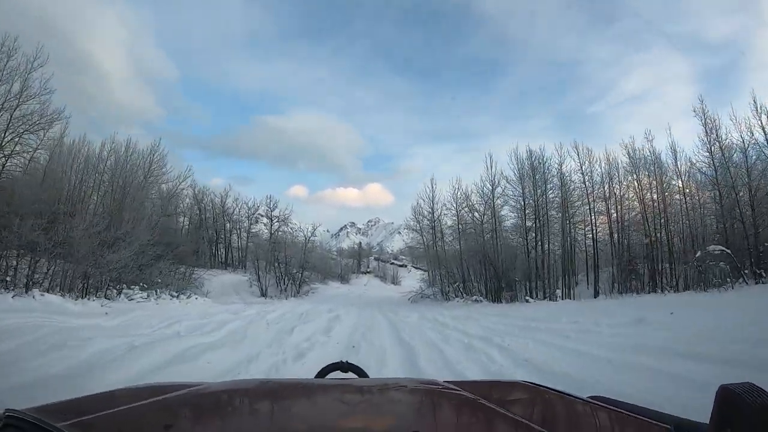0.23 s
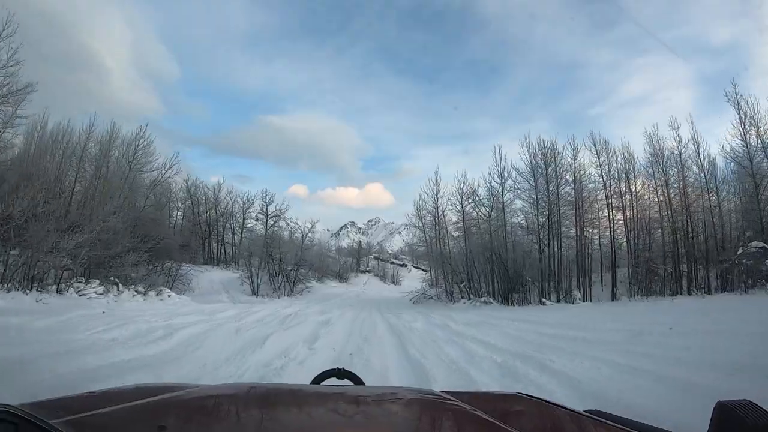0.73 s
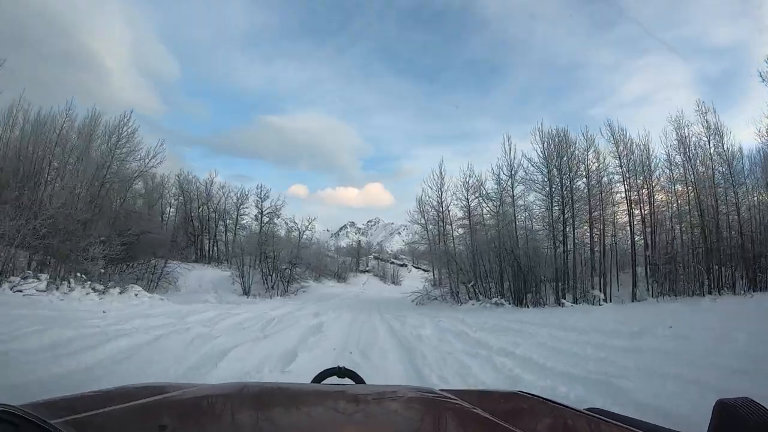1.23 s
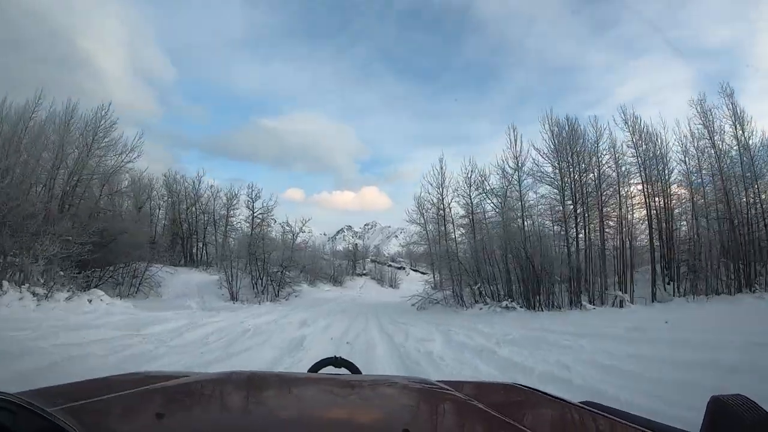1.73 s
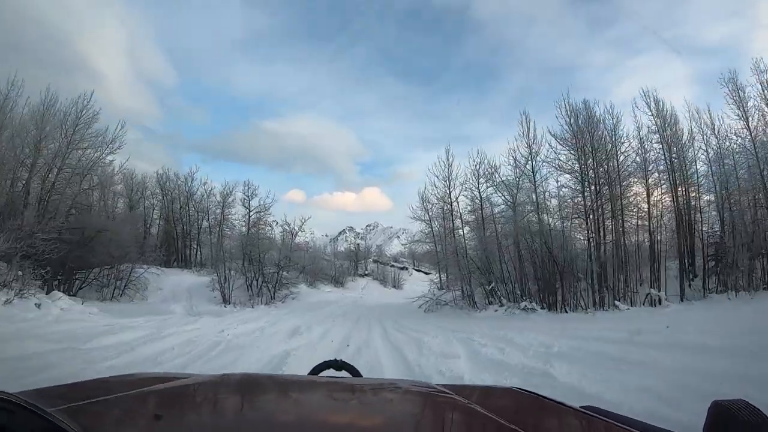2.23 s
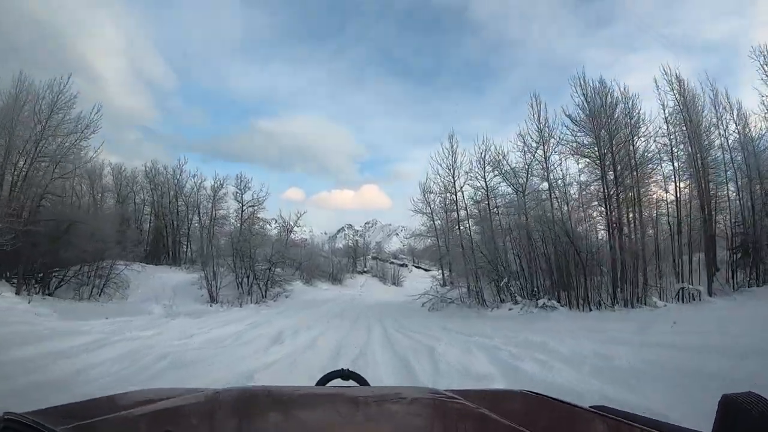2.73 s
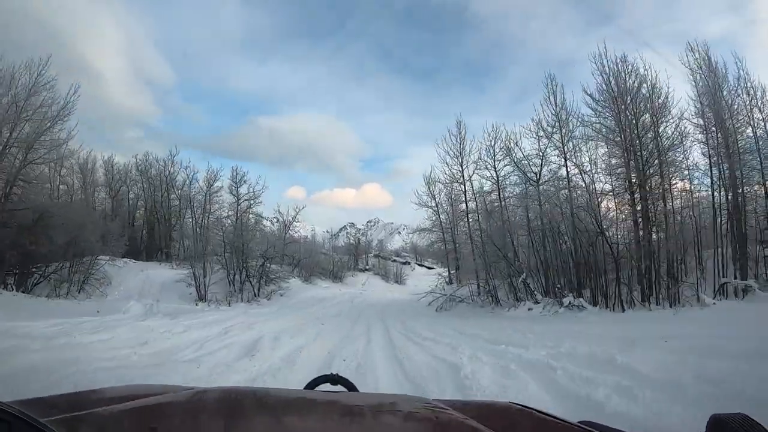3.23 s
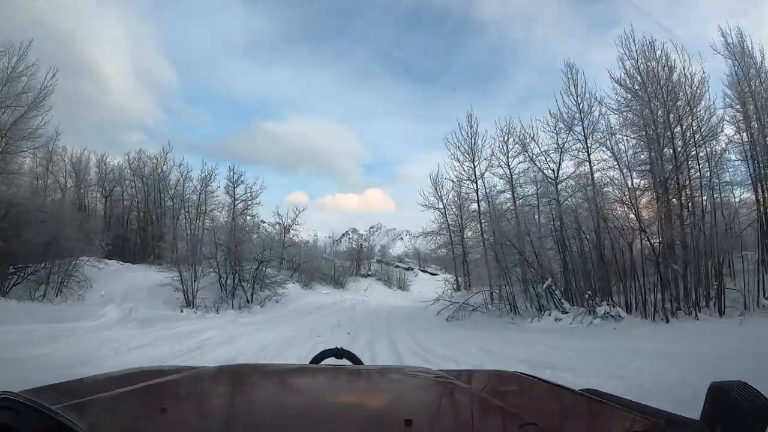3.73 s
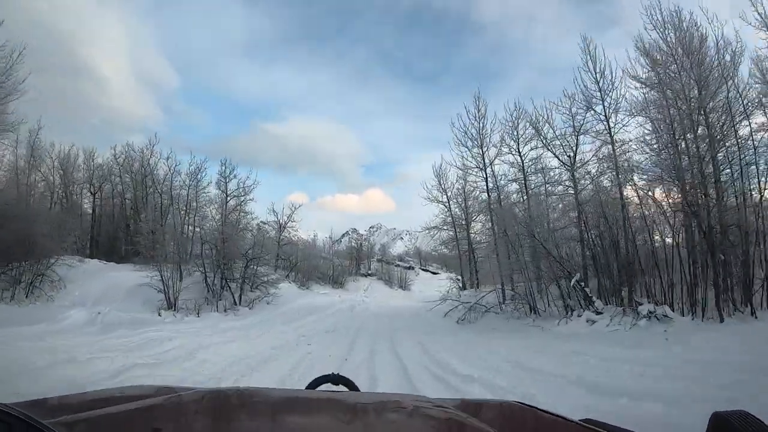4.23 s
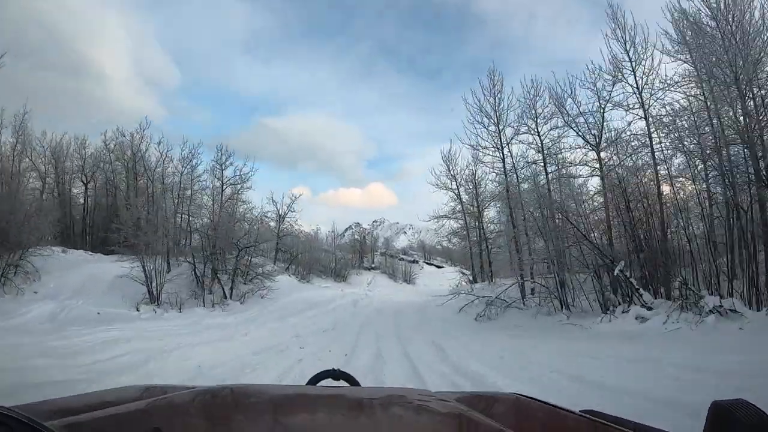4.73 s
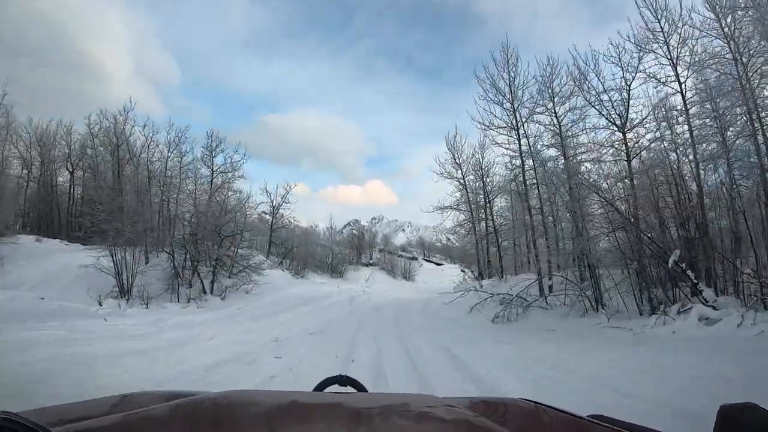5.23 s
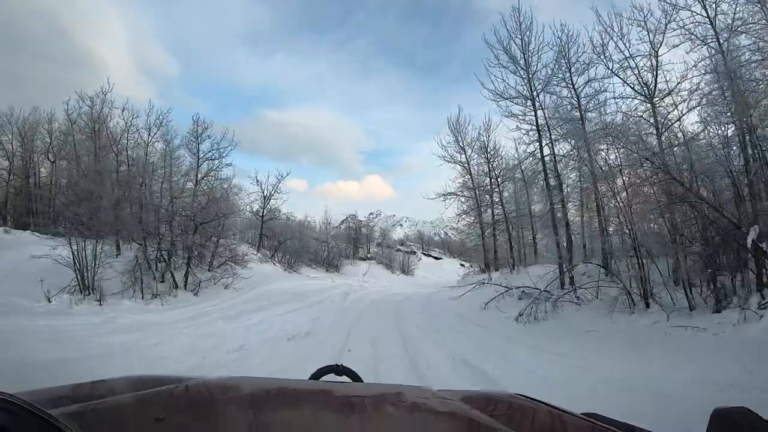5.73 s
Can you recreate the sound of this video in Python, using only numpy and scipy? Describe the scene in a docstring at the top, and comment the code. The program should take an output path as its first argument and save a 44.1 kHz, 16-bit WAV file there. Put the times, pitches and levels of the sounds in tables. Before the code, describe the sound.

A microphone mounted on a truck's body picks up a dominating low engine drone and uneven chassis rumble, dense, boomy and slightly compressed, with no echo. The engine starts fairly high, sags in pitch until about 0.8 s, idles along low to 1.2 s, pulls up by 1.8 s, holds, then climbs from 2.8 to 3.7 s and stays steady and harder-edged. Quiet tyre roar and gritty snow crunch continue throughout, with a barely audible rough whine. A strong clack and snow scuff comes at 0.15 s, softer thuds near 0.8 and 1.35 s, a cluster of scuffs around 2.05 s, a knock at 2.43 s, a sharp double clack at 3.52 s, a dull bump at 4.2 s and another knock at 5.02 s. Small ice ticks flick at 2.26 and 4.56 s. Powdery hiss brightens around 3 to 3.3 s, then crisp crunching thickens from 5.2 s to the end at 6 s.

```python
"""The engine of a four-wheel-drive truck, crawling along packed snow, heard by a microphone on its body.
It sags, then pulls up again: gliding firing orders boom through body resonances over a deep noise rumble.
Tyres roar, crunch and hiss as filtered noise and fractures; snow lumps scuff and ring the panels.
Ruts make loose bodywork knock, ice chips tick, a faint whine holds on, and a limiter rides on the bass."""
import sys
import numpy as np
from scipy import signal
from scipy.fft import rfft, irfft
from scipy.io import wavfile
from scipy.ndimage import uniform_filter1d, minimum_filter1d

SR = 44100
rng = np.random.default_rng(int(sys.argv[2]) if len(sys.argv) > 2 else 0)


def generate_wav(sig):
    """Save sig (samples, or channels by samples) to the path in sys.argv[1] as 16-bit PCM at SR."""
    pcm = np.round(np.clip(np.atleast_2d(sig).T, -1, 1) * 32767).astype(np.int16)
    wavfile.write(sys.argv[1], SR, pcm)


N = 264145


def undb(db):
    """Decibels to gain."""
    return 10 ** (np.asarray(db) / 20)


def unit(x):
    """Scale to rms 1."""
    return x / np.sqrt(np.mean(x ** 2))


def curves(table):
    """One value a sample for each column after the time column."""
    seconds, *columns = np.transpose(table)
    t = np.arange(N) / SR
    return [np.interp(t, seconds, column) for column in columns]


def gain_at(hz, points):
    """Read a spectrum on a log-frequency axis."""
    point_hz, db = np.transpose(points)
    return undb(np.interp(np.log(hz + 1e-6), np.log(point_hz), db))


def colour(x, points):
    """Filter by a spectrum, falling steeply beyond its ends."""
    hz = np.arange(len(x) // 2 + 1) * SR / len(x) + 1e-6
    lowest_hz, highest_hz = points[0][0], points[-1][0]
    skirts = np.minimum(1, np.minimum(hz / lowest_hz, highest_hz / hz)) ** 4
    return irfft(rfft(x) * gain_at(hz, points) * skirts, len(x))


def walk(rate):
    """Random levels of rms 1, each held for 1 / rate seconds and smoothed twice."""
    hold = int(SR / rate)
    held = np.repeat(rng.standard_normal(N // hold + 1), hold)
    smooth = uniform_filter1d(uniform_filter1d(held, hold), hold)
    return unit(smooth[:N])


def grains(per_s, spread_db, size=N):
    """Dense tiny fractures: random clicks of unequal strength."""
    strikes = rng.random(size) < per_s / SR
    strength = undb(spread_db * rng.standard_normal(size))
    return unit(strikes * rng.standard_normal(size) * strength)


def chassis(level_db=-18.5, sway_db=2.5):
    """The rutted trail shakes the body and the microphone mount: low noise in uneven swells."""
    # Each row: frequency in Hz, relative level in dB per Hz.
    rumble_spectrum = [(8, -22), (14, -6), (20, -1), (32, -2.5), (46, 2.5), (60, -8), (78, -14),
                       (100, -13.5), (125, -19), (150, -23.5), (180, -36.5), (260, -46.5)]
    shake = unit(colour(rng.standard_normal(N), rumble_spectrum))
    return shake * undb(level_db + sway_db * walk(6))


def whine(hz=3160, width_hz=110, level_db=-68):
    """A faint, rough whine from the running gear: noise through one narrow resonance."""
    band = signal.iirpeak(hz, hz / width_hz, fs=SR)
    tone = unit(signal.lfilter(*band, rng.standard_normal(N)))
    return tone * undb(level_db + walk(21))


def loose_snow():
    """Change of crunch and powder in dB as the tyres plough through patches, each easing in and out."""
    # Patches of loose snow. Each row: middle in seconds, length in seconds,
    # rise of the crunch in dB, rise of the powder in dB.
    patches = [(1.506, 0.53, 1.5, -1), (1.955, 0.37, 2.5, 1.5), (2.99, 0.32, 0, 9), (3.29, 0.31, 5.5, 8),
               (4.24, 0.42, 1.5, -1), (4.955, 0.28, 6.5, 3), (5.115, .12, 2, 9), (5.213, 0.12, 2, 15.5),
               (5.56, 0.32, 6.5, 10), (5.773, 0.29, 6.5, 14)]
    t = np.arange(N) / SR
    total_db = 0
    for middle, length, *rises_db in patches:
        swell = np.cos(np.pi * np.clip((t - middle) / length, -.5, .5))
        total_db = total_db + np.outer(rises_db, swell)
    return total_db


def tyres(revs, roar_gain_db=2.5, bite_depth_db=1.0):
    """Tread packs snow in quick, uneven bites; crust and powder grow with speed and vary in loose snow."""
    # Dull roar of the tread. Each row: time in seconds, level in dB before roar_gain_db and the bites.
    roar_levels = [(0.03, -45), (0.35, -43.5), (0.8, -44), (1.63, -46), (2.09, -48.5), (2.6, -50),
                   (3.58, -46), (3.79, -46), (4.13, -45.5), (5.3, -46), (5.65, -45), (5.96, -45.5)]
    # Tyre roar, breaking crust and thrown powder. Each row: frequency in Hz, relative level in dB per Hz.
    roar_spectrum = [(120, -13), (200, 2.5), (300, 3), (430, -1.5), (500, -4.5), (570, -3), (720, -10),
                     (950, -15), (1400, -20.5), (3000, -38)]
    crust_spectrum = [(600, -9), (1300, 0.5), (2200, 2.5), (2850, 1.5), (3150, -1), (3500, -2), (4400, -3),
                      (5000, -13.5), (5700, -21.5), (7500, -27.5), (9000, -35)]
    powder_spectrum = [(2000, -14), (3500, 7.5), (4600, 3), (5500, -1), (6300, -8), (7200, 2), (7700, -7),
                       (8500, -18.5), (11000, -29.5)]
    cruise_crust_db, crust_db_per_octave = -60, 0.5
    cruise_powder_db, powder_db_per_octave = -78, 3

    roar_db, = curves(roar_levels)
    loose_crust_db, loose_powder_db = loose_snow()
    crust_db = cruise_crust_db + crust_db_per_octave * revs + loose_crust_db
    powder_db = cruise_powder_db + powder_db_per_octave * revs + loose_powder_db
    bite_db = bite_depth_db * (walk(70) + walk(180))

    roar = unit(colour(rng.standard_normal(N), roar_spectrum))
    crust = unit(colour(grains(per_s=5500, spread_db=0.5), crust_spectrum))
    powder = unit(colour(grains(per_s=2500, spread_db=1.0), powder_spectrum))
    out = roar * undb(roar_db + roar_gain_db + bite_db / 2)
    out = out + crust * undb(crust_db + bite_db)
    return out + powder * undb(powder_db + bite_db)


def chips(width_hz=1100, decay_s=0.011):
    """Hard bits of ice flicked against the body: brief bursts of noise in a narrow, bright band."""
    # Each row: start in seconds, centre of the band in Hz, peak level in dB.
    ice_ticks = [(1.113, 3900, -50.5), (2.258, 3500, -40.5), (2.803, 4300, -51), (3.093, 3000, -44.5),
                 (3.218, 7200, -62), (3.343, 7200, -58.5), (3.703, 3934, -46), (3.733, 3242, -51.5),
                 (4.559, 3230, -36.5), (4.67, 3710, -46.5), (5.66, 3100, -45), (5.822, 3825, -43)]
    out = np.zeros(N)
    t = np.arange(SR // 20) / SR
    for start, hz, db in ice_ticks:
        edges_hz = [hz - width_hz / 2, hz + width_hz / 2]
        band = signal.butter(2, edges_hz, "band", fs=SR, output="sos")
        burst = rng.standard_normal(len(t)) * np.exp(-t / decay_s)
        tick = signal.sosfilt(band, burst)
        i = int(start * SR)
        out[i:i + len(t)] += undb(db) * tick / np.abs(tick).max()
    return out


def panel_ring(tilt_db, lag_cycles=2.49, build_s=0.0008, scatter_db=1.5):
    """One contact rings the bodywork: modes build up quickly, low ones later, a little differently each time."""
    # Modes of the front bodywork. Each row: frequency in Hz, level in dB before tilt and scatter,
    # time to fall by 60 dB in seconds.
    modes = [(304, 4, 0.072), (405.6, 2.5, .055), (563, -2, .045), (678, 1.5, .035), (946, 1.5, .038),
             (1420, -7.5, 0.044), (1578, -2, .06), (1914, -5, .05), (2195, -3, .055), (2510, -4.5, .05),
             (2660, -7, 0.059), (2850, -8.5, 0.043), (3110, -7, 0.06), (3740, -13.5, .04),
             (3960, -12.5, .04)]
    t = np.arange(SR // 5) / SR
    out = 0
    for hz, db, t60 in modes:
        size = undb(db + tilt_db * np.log2(hz / 1000) + scatter_db * rng.standard_normal())
        age = np.maximum(t - lag_cycles / hz, 0)
        build = 1 - np.exp(-age / build_s)
        decay = np.exp(-np.log(1000) * age / t60)
        out = out + size * build * decay * np.sin(2 * np.pi * (hz * age + rng.random()))
    soft_contact = signal.butter(4, 4500, fs=SR, output="sos")  # little treble
    return signal.sosfilt(soft_contact, out)


def knocks(level_db=-4, bounce_s=.004, bounce_db=-10, count=3):
    """A jolt over a rut makes loose bodywork clack and chatter: weakening contacts ring the same modes."""
    # Each row: start in seconds, level in dB before level_db and the bounces, treble tilt in dB per octave.
    jolts = [(0.098, -42.5, -2), (.147, -31.5, -0.5), (.159, -33, -2.5), (.803, -49, -2), (2.433, -33, -2),
             (2.666, -49.5, -10), (3.307, -42, -2.5), (3.472, -44.5, -4), (3.514, -30.5, 0),
             (3.526, -36.5, 0.5), (4.160, -46.5, 0.5), (5.016, -30.5, -1.5), (5.306, -50, -4),
             (5.649, -47, -4)]
    out = np.zeros(N)
    for start, db, tilt_db in jolts:
        for bounce in range(count):
            delay_s = bounce * bounce_s * rng.uniform(.8, 1.2)
            i = int((start + delay_s) * SR)
            ring = panel_ring(tilt_db)
            out[i:i + len(ring)] += undb(level_db + db + bounce * bounce_db) * ring
    return out


def lumps(rise_s=0.0043, scuff_db=-4, ring_db=-9, grit_db=3, crumble_db=2.0):
    """Each snow lump crumbles in a stuttering swell of fractures that scuffs the body and rings its panels."""
    # Each row: contact in seconds, level in dB before scuff_db and the swell,
    # treble tilt in dB per octave, decay in seconds.
    snow_lumps = [(.085, -45.5, -2, 0.011), (.148, -23, -1, 0.012), (.222, -40.5, 0, 0.02),
                  (.797, -38, -3, 0.014), (1.346, -34.5, -3.5, .019), (1.9, -43, -0.5, .012),
                  (2.02, -42.5, -1.5, 0.01), (2.058, -33.5, -2, 0.017), (2.09, -37, -2.5, 0.014),
                  (2.432, -33, -1.5, .01), (2.529, -44, 1, 0.009), (2.662, -45.5, -2, .014),
                  (2.967, -35, -3.5, 0.012), (2.995, -39.5, -1, 0.0098), (3.053, -46, -0.5, .008),
                  (3.203, -42.5, -2, .008), (3.22, -42.5, -0.5, .018), (3.515, -24, -.5, 0.0068),
                  (3.525, -29.5, .5, .01), (3.635, -39, -1.5, 0.011), (3.987, -46.5, -3, 0.01059),
                  (4.2, -31.5, -4, 0.019), (4.31, -46, -2, 0.014), (4.45, -45, -2.5, .008),
                  (4.53, -42.5, -0.5, 0.009), (4.72, -45, -2, .012), (4.937, -36.5, -5.5, 0.014),
                  (4.968, -43, -1.5, .014), (5.015, -30.5, -1.5, .008), (5.13, -47, 2.5, .014),
                  (5.221, -36.5, -2, 0.007), (5.475, -45, 0, .025), (5.548, -41, 1.5, .022),
                  (5.574, -38, 2, 0.015), (5.591, -38, 3, .007), (5.625, -42, -2, .016),
                  (5.689, -39, 2.5, .008), (5.714, -38, 0, .018), (5.783, -38.5, 2.5, .018),
                  (5.82, -35.5, 1.5, .017), (5.848, -44.5, 3.5, .006)]
    # Scuffing snow. Each row: frequency in Hz, relative level in dB per Hz before the tilt.
    scuff_spectrum = [(250, -8.5), (500, -2.5), (1200, -5.5), (1600, -3), (2400, -0.5), (3200, -2.5),
                      (4000, -7), (5000, -17.5), (6200, -29), (7000, -22.5), (8000, -28), (9000, -39.5),
                      (12000, -48.5)]
    out = np.zeros(N + SR)
    t = np.arange(SR // 4) / SR - .04  # seconds from contact
    since = t - .003  # the lump gives way just after contact
    for start, db, tilt_db, decay_s in snow_lumps:
        # a swell with a rounded top
        force = 1 / (np.exp(-since / rise_s) + np.exp(since / max(decay_s, .002)))
        spectrum = [(hz, level + tilt_db * np.log2(hz / 2500)) for hz, level in scuff_spectrum]
        fractures = grains(per_s=9000, spread_db=grit_db, size=len(t))
        i = int((start + t[0]) * SR)
        out[i:i + len(t)] += undb(db + scuff_db) * force * unit(colour(fractures, spectrum))
    scuff = out[:N] * undb(crumble_db * walk(500))
    ringing = signal.fftconvolve(scuff, panel_ring(tilt_db=-2.5))[:N]
    ringing = unit(ringing) * np.std(scuff)
    return scuff + undb(ring_db) * ringing


def engine(hz, revs, level_db=-17.5, waver_db=1.34, hunt=.002):
    """Firing orders waver as they glide through the body's resonances; higher revs sound harder."""
    # Unequal cylinders give half orders. Each row: multiple of the firing rate,
    # relative level at cruise in dB, growth in dB per octave of revs.
    orders = [(.5, -11, 3.5), (1, 0.6, 4), (1.5, -7, 22.5), (2, -3.5, 2), (3, -3.5, 19), (4, -6.5, 19.5)]
    # How the body passes the engine on. Each row: frequency in Hz, gain in dB.
    body_response = [(25, 1), (47, 0.5), (55, -3.5), (66, -1), (73, -5), (83, -7), (92, -6), (100, -0.5),
                     (111, -11.5), (128, -12), (145, -19), (175, -37), (205, -34), (220, -26), (250, -36.5),
                     (275, -38), (294, -26.5), (450, -39.5)]
    phase = 2 * np.pi * np.cumsum(hz * (1 + hunt * walk(12))) / SR
    out = 0
    for multiple, db, growth_db in orders:
        line = np.sqrt(2) * np.sin(multiple * phase + 2 * np.pi * rng.random())
        strength = undb(db + growth_db * revs + waver_db * walk(9))
        out = out + line * gain_at(multiple * hz, body_response) * strength
    return out * undb(level_db)


def scene():
    """Engine speed drives firing orders, crust and powder; all reach one microphone, with no echo in open snow."""
    # Engine speed and effort. Each row: time in seconds, firing rate in Hz, load in dB.
    engine_course = [(0.0, 63.96, 0.5), (0.25, 59.78, -1), (0.55, 51.69, -0.5), (0.8, 46.87, -1),
                     (1.2, 46.62, -1), (1.8, 55, 1), (2.3, 55.99, 0), (2.8, 57.28, 1), (3.25, 66.03, 1),
                     (3.7, 70.85, 0), (4.2, 71.81, -1.5), (4.5, 72.73, .5), (5.15, 73.6, 0),
                     (5.6, 72.56, -.5), (5.98, 74.2, 1)]
    cruise_hz = 68.34  # firing rate that the order, crust and powder levels refer to
    hz, load_db = curves(engine_course)
    revs = np.log2(hz / cruise_hz)  # octaves above cruise
    truck = chassis() + whine() + knocks() + engine(hz, revs) * undb(load_db)
    snow = tyres(revs) + chips() + lumps()
    return (truck + snow)[None]


def record(dry, knee_db=-11, hold_s=0.016, ratio=3.1, top_hz=15000):
    """A fast look-ahead limiter holds the peaks down, mostly bass; the treble above top_hz is cut."""
    hold = int(hold_s * SR)
    gain = np.minimum(1, undb(knee_db) / (np.abs(dry) + 1e-9)) ** (1 - 1 / ratio)
    gain = uniform_filter1d(minimum_filter1d(gain, hold), hold)
    top_cut = signal.ellip(8, .2, 70, top_hz, fs=SR, output="sos")
    return signal.sosfilt(top_cut, dry * gain)


dry = scene()
out = record(dry)
generate_wav(out)
```